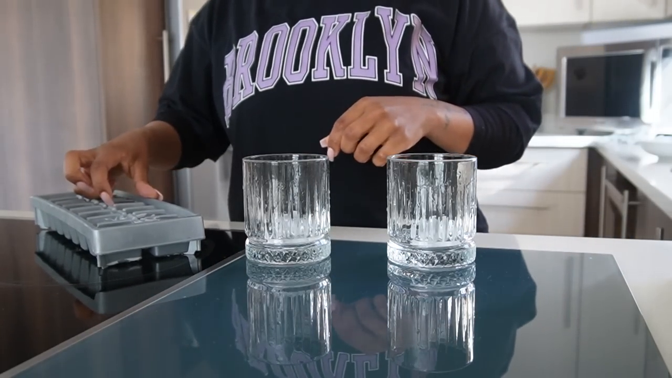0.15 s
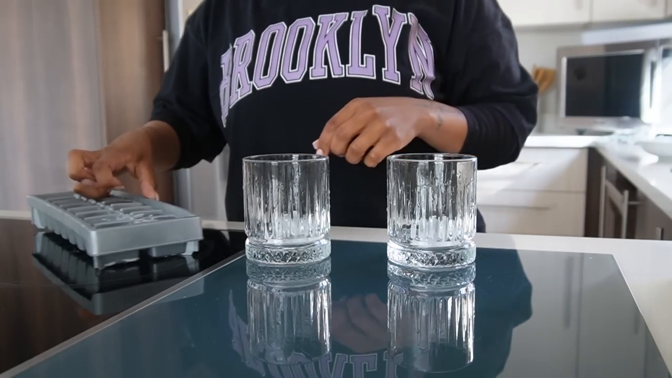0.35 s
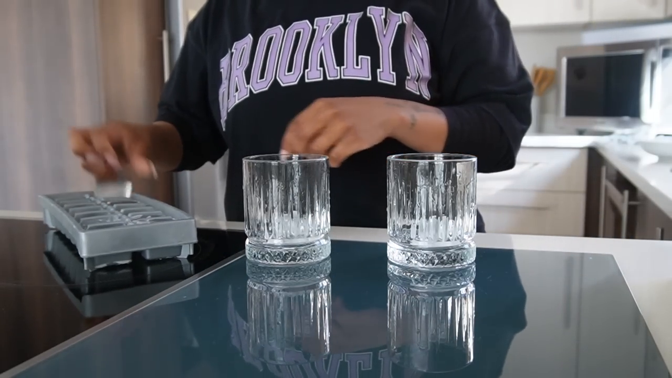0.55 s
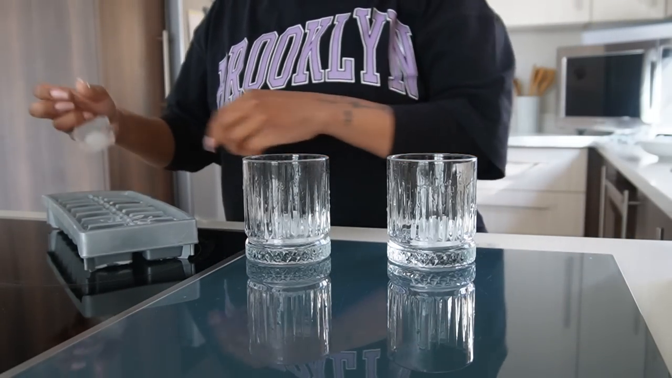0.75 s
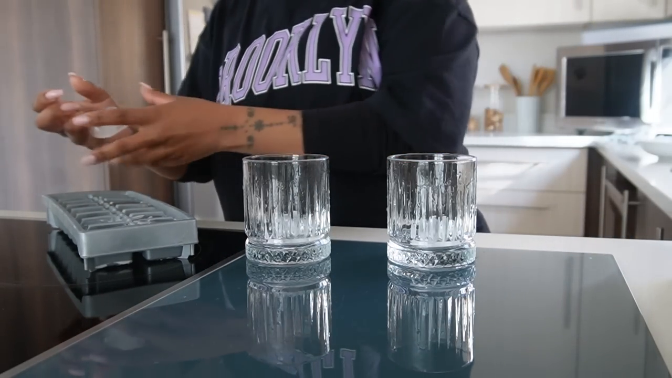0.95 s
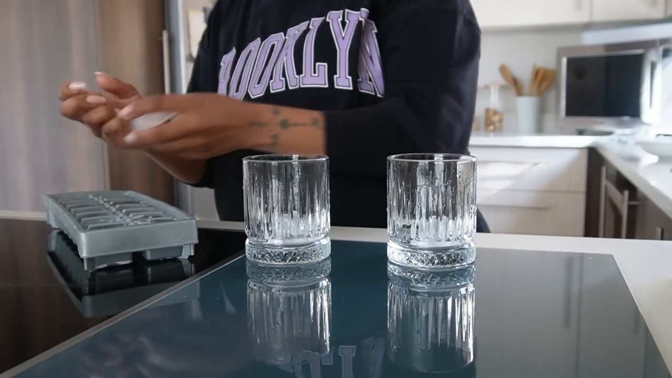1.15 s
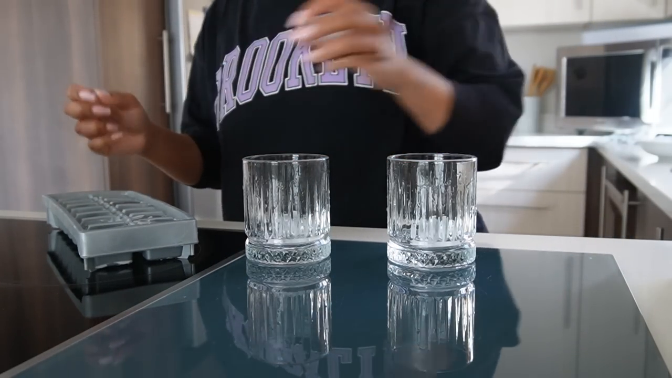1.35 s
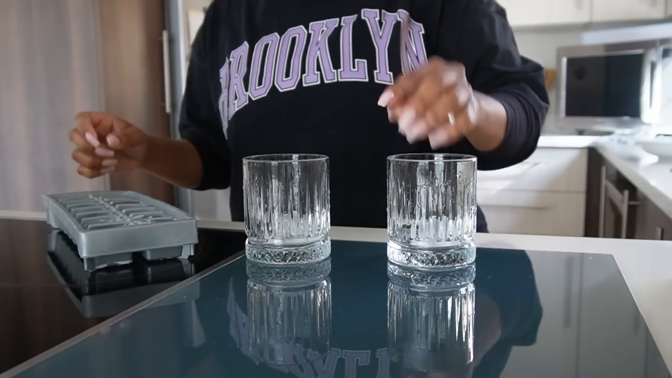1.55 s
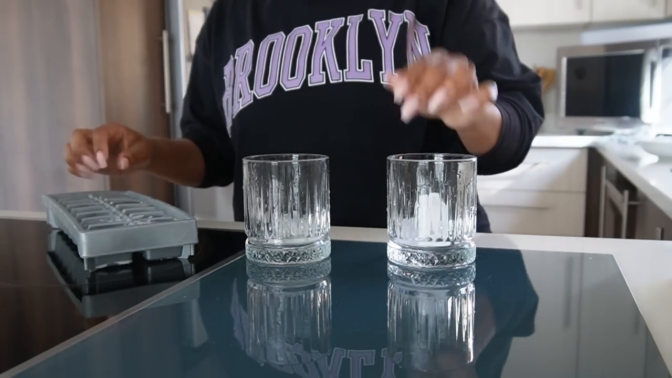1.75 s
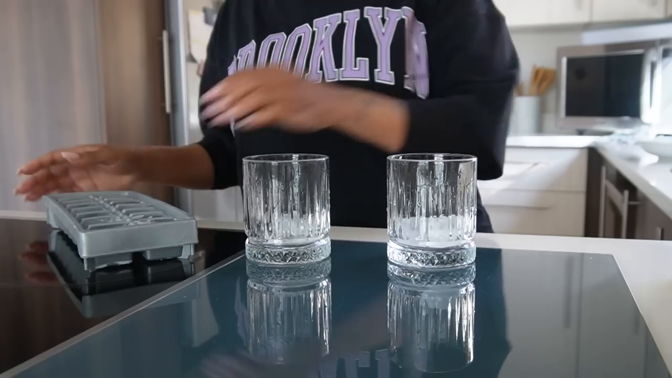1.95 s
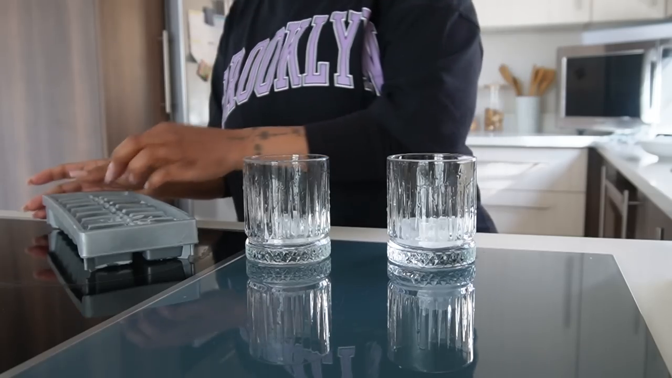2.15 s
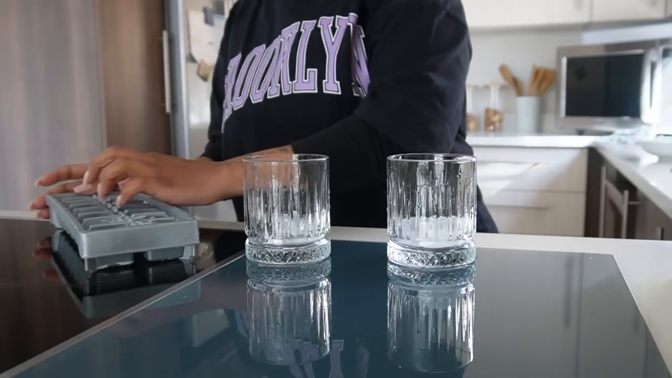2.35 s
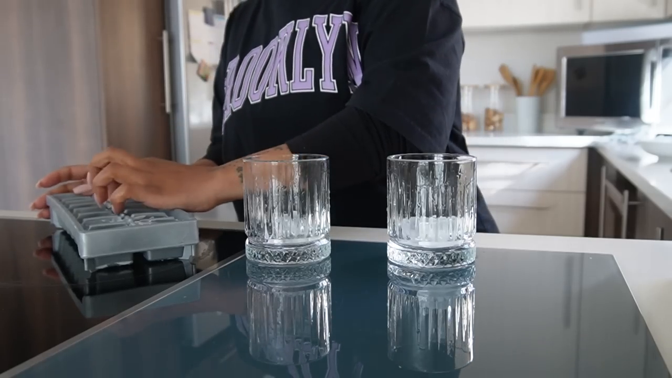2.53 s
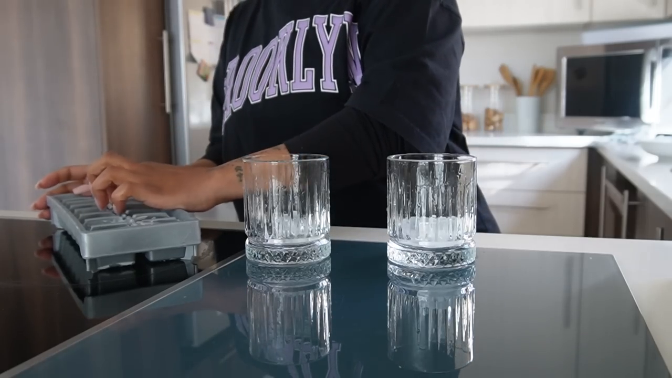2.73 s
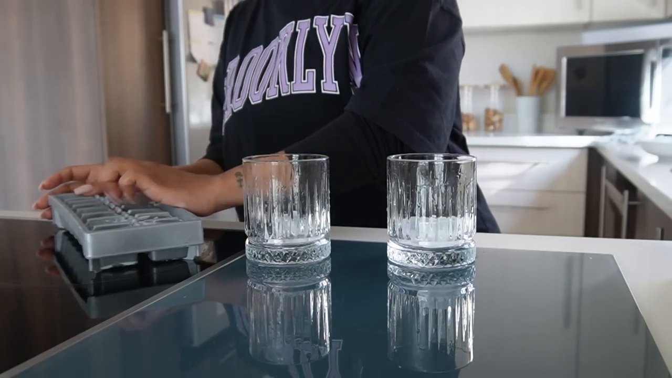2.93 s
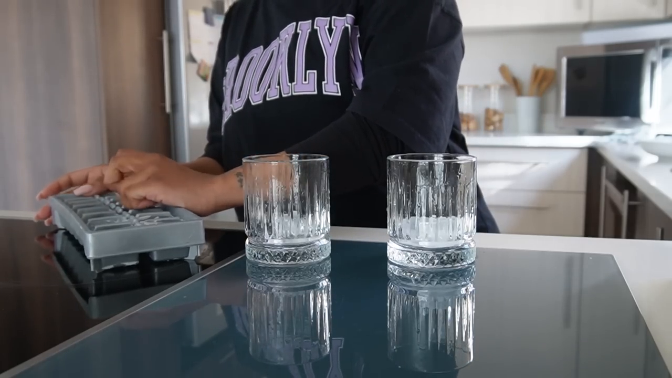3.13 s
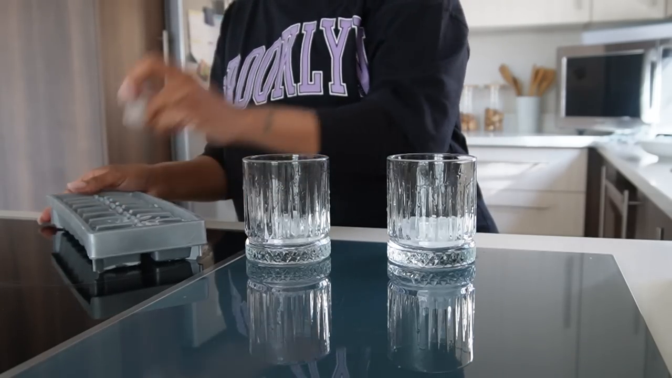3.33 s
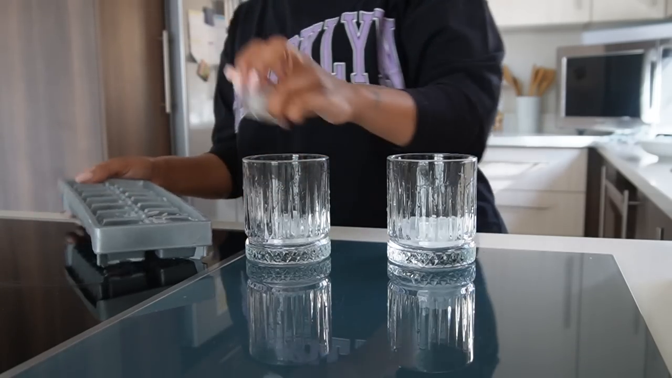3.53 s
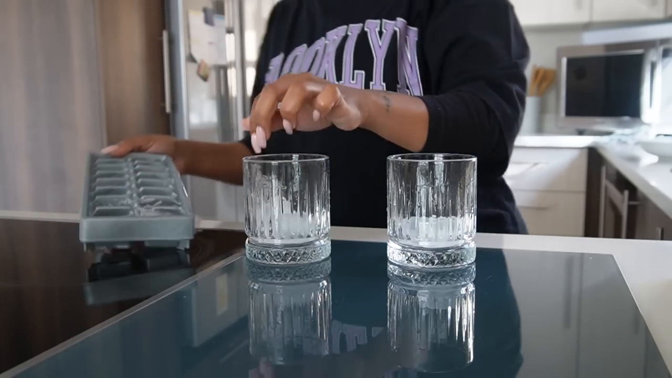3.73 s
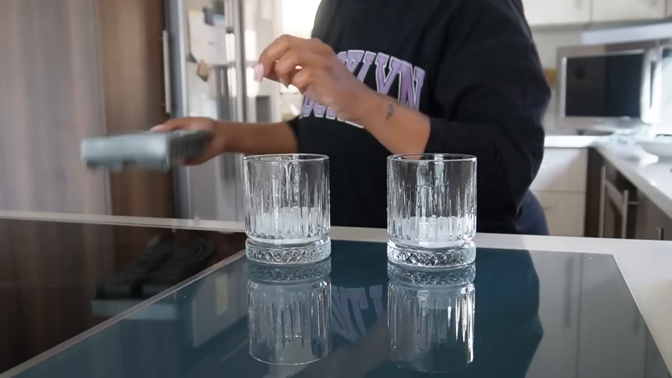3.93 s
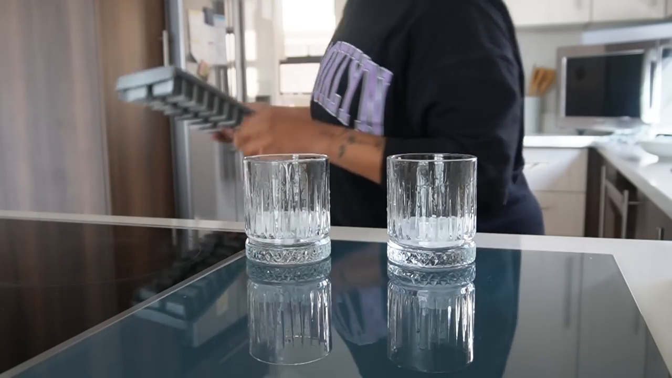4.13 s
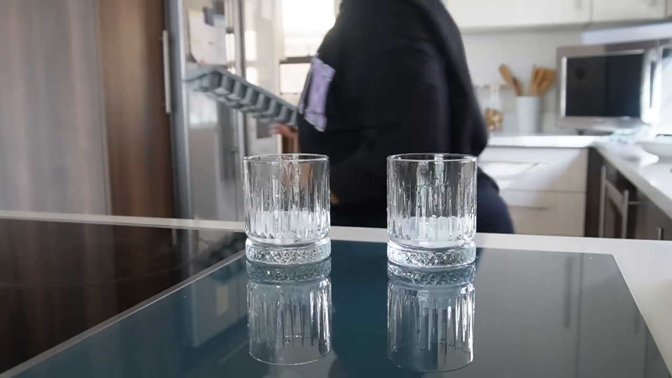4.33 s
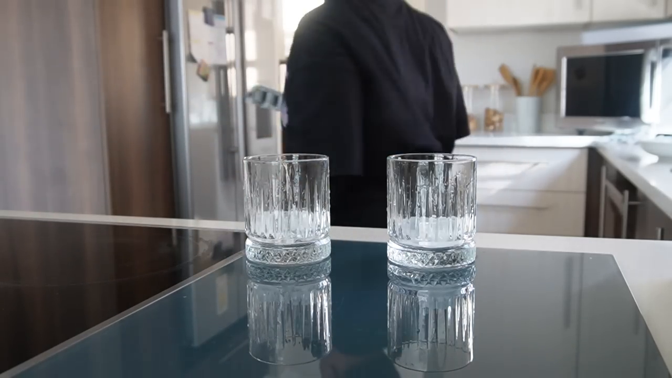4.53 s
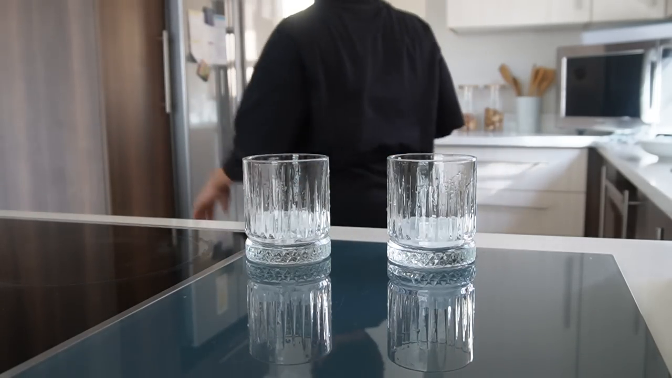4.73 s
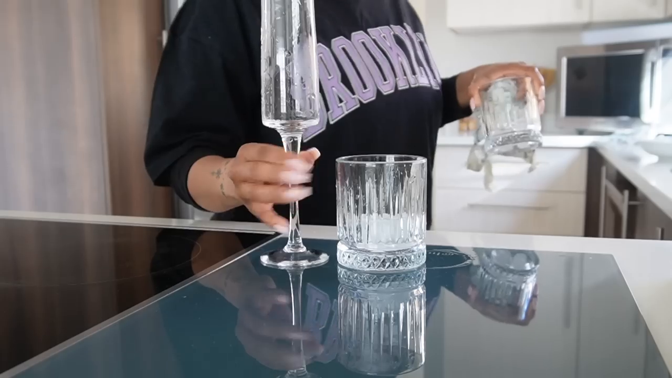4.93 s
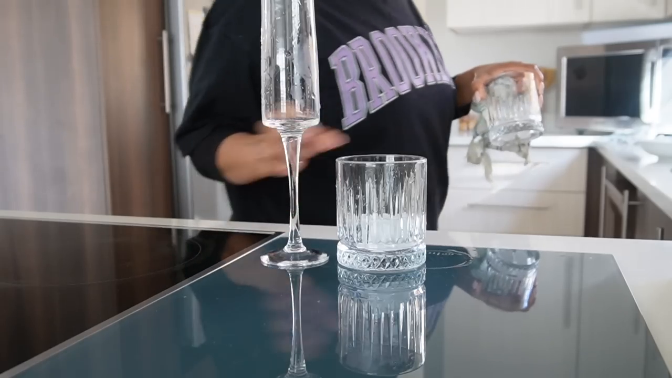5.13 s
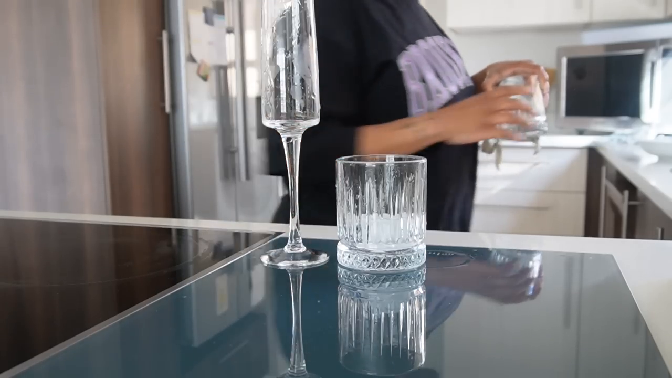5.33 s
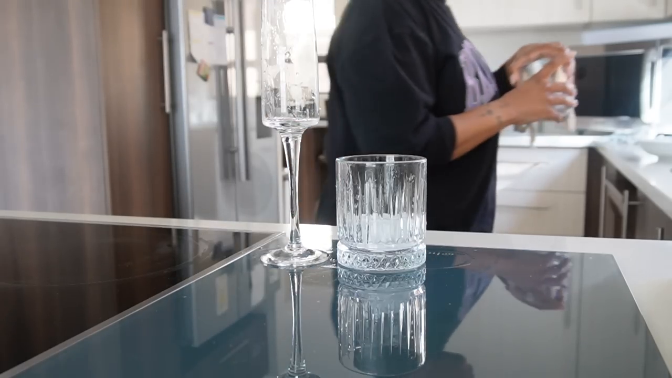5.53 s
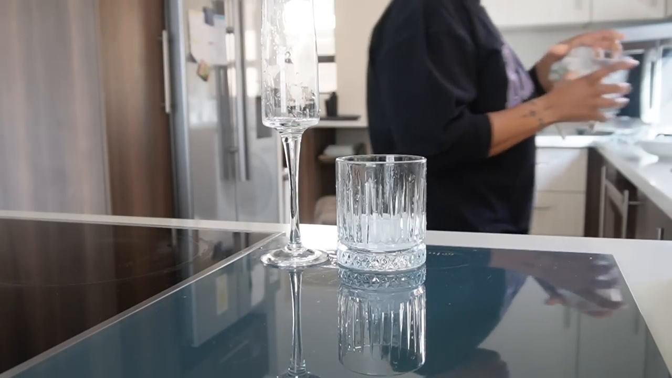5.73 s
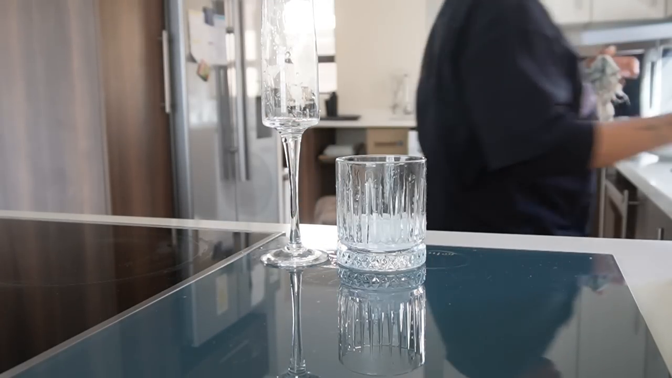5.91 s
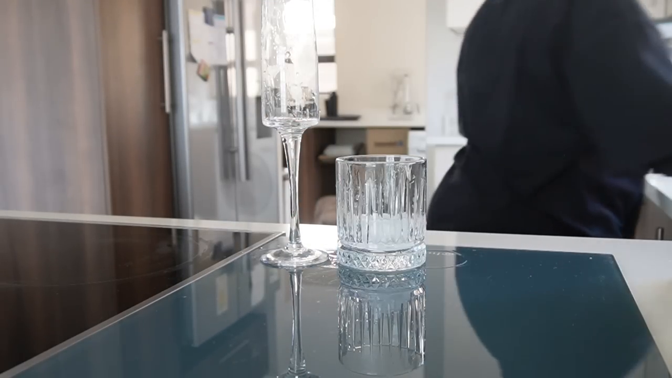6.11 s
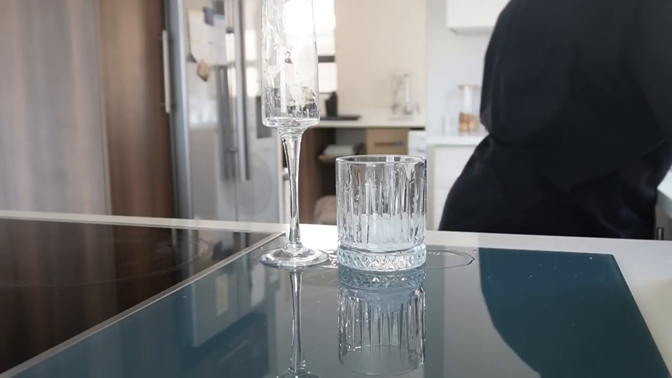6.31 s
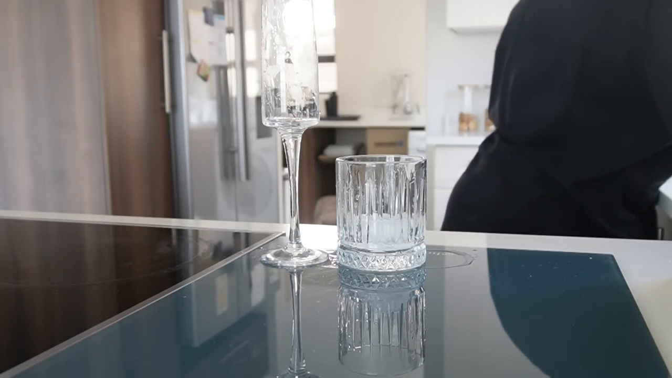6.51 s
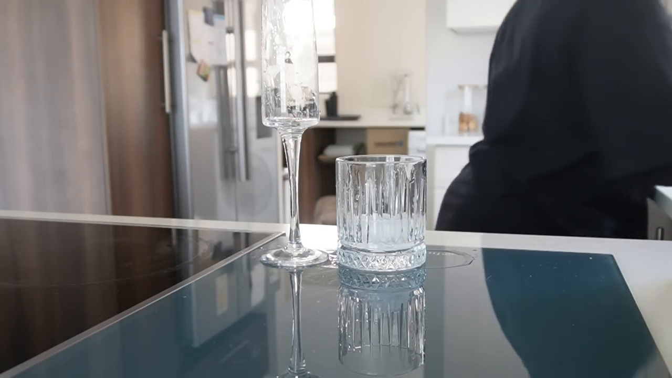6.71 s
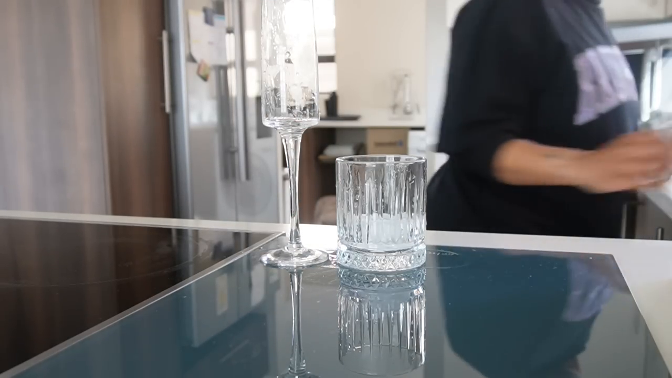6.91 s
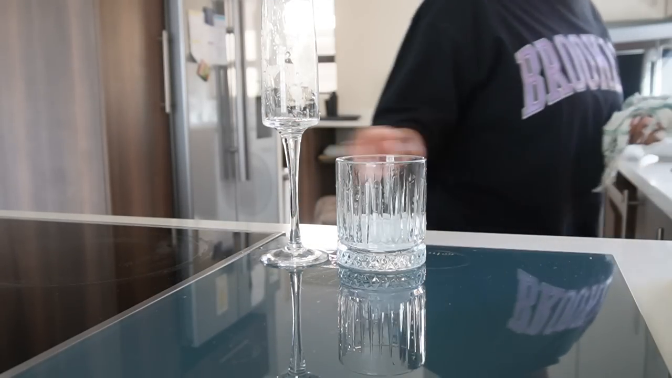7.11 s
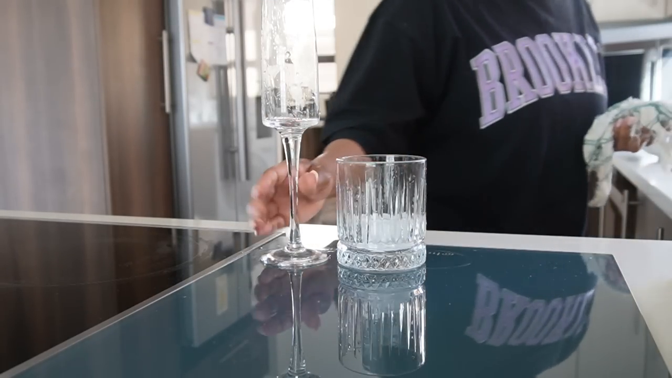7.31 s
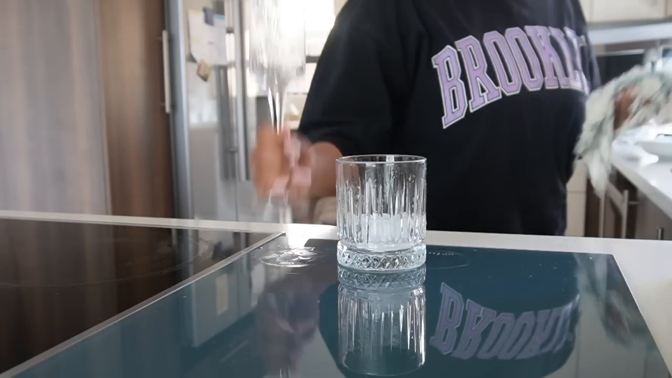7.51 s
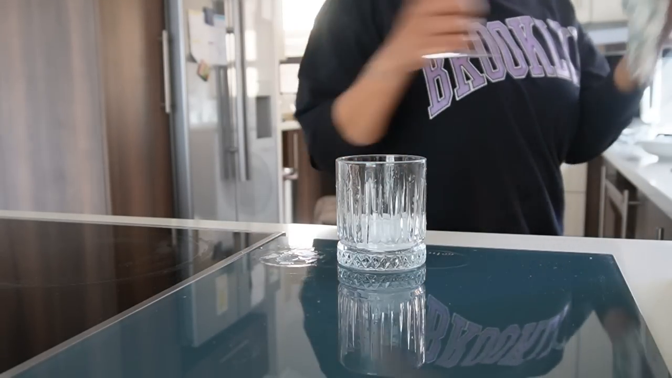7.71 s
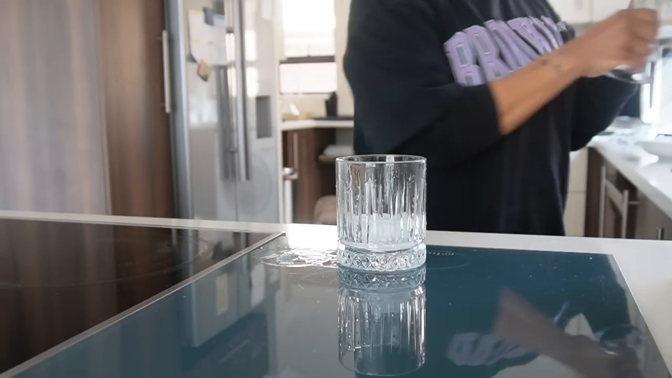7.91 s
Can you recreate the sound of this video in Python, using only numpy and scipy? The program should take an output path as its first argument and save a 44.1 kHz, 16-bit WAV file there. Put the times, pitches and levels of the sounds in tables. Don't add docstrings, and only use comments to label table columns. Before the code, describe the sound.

A lively, hard-walled kitchen, closely miked, with a faint steady fridge hum and thin tap hiss. From 0 to 0.8 s a stiff plastic ice tray snaps sharply, loudest near 0.35 s, with dry finger rubbing. At 1.7 s a cube knocks into a thick tumbler, bouncing and sliding until about 2.05 s with a hollow boom and short glassy ring. Tray cracks return from 2.3 to 3.5 s, strongest around 2.7. At 3.65 s a second cube clatters into another glass, ringing longer and clearer until about 3.95. At 4.9 s the water stops abruptly; ice jingles rapidly in a carried glass for a quarter second, over a low footstep thud. Soft distant glass taps follow at 5.6-6.15 s, then a loud echoing glass set-down with small rocks at 6.46-6.57. Faint taps at 7.2-7.5 and 7.9 end it over quiet hum.

```python
import sys
import numpy as np
from scipy import signal
from scipy.io import wavfile
from scipy.ndimage import uniform_filter1d

SR = 44100
rng = np.random.default_rng(int(sys.argv[2]) if len(sys.argv) > 2 else 0)


def waveform_to_disk(signal):
    frames = np.transpose(np.atleast_2d(signal))
    scaled = np.clip(frames, -1, 1) * 32767
    samples = np.round(scaled).astype(np.int16)
    wavfile.write(sys.argv[1], SR, samples)


def level_to_linear(level):
    exponent = np.asarray(level, float) / 20
    return 10 ** exponent


N = 355445
SCENE_CHANGE_S = 4.885

# f/Hz, level/dB rms, width/Hz
FRIDGE_LINES = [(400, -52.5, 4.2), (498.2, -45, 0.18), (2190, -58.5, 5.2), (2312, -52, 3.6),
                (2440, -84, 4.)]
# f/Hz, level/dB per Hz
AIR_SPECTRUM = [(47, -54), (80, -24), (170, -19), (259, -20.5), (395, -11), (441, -8), (493, -7),
                (550, -15), (734, -21), (1820, -12), (2220, -11), (3620, -10), (9190, -24.5), (14300, -38),
                (16000, -35)]
AIR_DB = -39.5
# f/Hz, level/dB per Hz
TAP_SPECTRUM = [(530, -54), (900, -12), (991, -51), (1490, -54), (1620, -14), (2540, -8), (4310, 0),
                (7310, -4), (13200, -19), (16000, -26)]
# t/s, level/dB
TAP_FLOW = [
    (0, -35),
    (3.5, -34.5),
    (4.88, -32.5),
]
# f/Hz, side level/dB under mid
APART = [(60, -11), (400, -14.5), (1000, -15.5), (4500, -22), (7000, -22), (11000, -14), (16000, -7)]

# t/s, peak level/dB, low f/Hz, high f/Hz, treble level/dB over peak
FIRST_SNAPS = [(0.0267, -7, 1900, 2460, -20), (0.0506, -8, 2100, 3650, -3), (0.2239, -9.5, 2080, 3250, 1.5),
               (0.3104, -9, 2110, 3640, -1), (0.34, -15, 2060, 2900, -2), (0.3437, -1, 1900, 2800, -4.5),
               (0.3476, -4, 1690, 2300, -7), (0.354, -16, 1970, 2900, -7), (0.359, -3.5, 1600, 3200, -24),
               (0.384, -6.5, 1880, 2680, -4), (0.4474, -13.5, 2200, 3600, -3), (0.513, -17, 2000, 3600, -1),
               (0.6053, -9.5, 1710, 3700, 1), (0.612, -17.5, 1110, 1750, -10),
               (0.631, -13.5, 1950, 2280, -4), (0.7262, -20, 2240, 3600, -10),
               (0.7501, -11, 2160, 3700, 1.5), (0.7556, -13.5, 2190, 3700, -8)]
# t/s, peak level/dB, low f/Hz, high f/Hz, treble level/dB over peak
SECOND_SNAPS = [(2.337, -26.5, 1250, 1510, -12), (2.43, -12, 2400, 3470, 1),
                (2.5652, -8.5, 2550, 3400, -18), (2.5883, -21, 1710, 3280, -11),
                (2.631, -14, 2060, 3400, -9), (2.6716, -13.5, 1950, 3220, -17),
                (2.6868, -5, 1480, 3300, -15), (2.7044, -2, 2040, 3230, -2.5),
                (2.793, -11.5, 2260, 3600, -1), (2.9409, -7, 2050, 3370, -14),
                (2.967, -21.5, 2100, 1690, -16), (3.0958, -17.5, 1880, 3300, -10),
                (3.147, -20, 2020, 3400, -6), (3.191, -10.5, 1410, 2500, -28), (3.283, -19, 2100, 3180, -3),
                (3.5009, -11, 1590, 2620, -27)]
SNAP_T60 = 0.04
# f/Hz, level/dB per Hz
CELL_BODY = [(100, -52), (343, -26), (415, -7.5), (836, -20.5), (1100, -11.5), (1870, -1), (3300, 0.5),
             (4600, -9), (9000, -31), (16000, -59)]
# start t/s, length/s, top level/dB, hollow pocket level/dB
TRAY_RUBS = [(.05, 0.046, -34, -4), (.355, 0.079, -27, 8.5), (.42, 0.063, -26, -5), (.53, 0.098, -21.5, -3),
             (.59, 0.072, -28, -8), (.755, 0.083, -39.5, 0), (2.68, 0.05, -25, 0.5), (2.72, 0.13, -28.5, 1),
             (2.95, 0.08, -36.5, 4.5), (3.0, 0.11, -32.5, -1), (3.085, 0.06, -35.5, 3.5),
             (3.14, 0.042, -36, 7), (3.195, 0.019, -42, 12), (3.26, 0.093, -30, -29)]
# f/Hz, level/dB per Hz
TRAY_BODY = [(59, -65), (100, -55), (343, -34), (415, -11.5), (836, -25.5), (970, -12), (1310, -15),
             (1870, -3), (2930, -2), (6290, -2.5), (16000, -40.5)]

# t/s, peak level/dB, low f/Hz, high f/Hz, treble level/dB over peak
RIGHT_KNOCKS = [(1.65, -26, 1500, 3100, -6), (1.688, -25, 760, 3000, 0), (1.719, -1, 1350, 2750, -21),
                (1.724, -10, 814, 3630, -25), (1.739, -12, 1350, 2700, -24), (1.7595, -7, 1750, 2430, -28),
                (1.766, -19, 1500, 4200, -23), (1.78, -11, 1420, 2500, -16), (1.807, -13, 1460, 3300, -18),
                (1.813, -16, 805, 1150, -12), (1.844, -13, 706, 2760, -16), (1.878, -6, 1920, 3330, -17),
                (1.8838, -4.5, 1540, 3000, -26), (1.896, -17, 1320, 4000, -28),
                (1.929, -5, 1290, 2580, -34), (1.961, -11.5, 1650, 2580, -25), (2.029, -20, 860, 1490, -18),
                (2.049, -24, 890, 1500, -20)]
# t/s, peak level/dB, low f/Hz, high f/Hz, treble level/dB over peak
LEFT_KNOCKS = [(3.644, -5.5, 1800, 2820, -9), (3.664, -4.5, 1040, 1520, -33), (3.709, 1.5, 2500, 3180, -27),
               (3.713, -18, 1150, 2860, -30), (3.728, -11, 1940, 2750, -31), (3.747, -5, 1190, 2600, -25),
               (3.752, -5, 1460, 2980, -28), (3.758, -5.5, 1420, 3200, -8), (3.766, -6, 1950, 3050, -31),
               (3.784, -19, 1950, 2650, -25), (3.797, -17, 2000, 2600, -28), (3.808, -15, 1140, 3250, -25),
               (3.849, -12.5, 1140, 3100, -27), (3.877, -15, 1450, 2400, -26),
               (3.897, -29, 1440, 2400, -26)]
KNOCK_T60 = 0.047
# f/Hz, level/dB per Hz
BOTTOM_BODY = [(60, -40), (270, -32), (750, -6.5), (1380, 2), (3200, 1), (4500, -4.5), (5500, -11),
               (9000, -28), (16000, -76)]
MOUTH_DB = (2.5, -6)
# t/s, peak level/dB
RIM_TICKS = [(1.6495, -24), (1.6872, -24), (1.7192, -19), (1.7398, -24), (1.8445, -30), (1.937, -30),
             (3.6368, -28), (3.7088, -11), (3.7255, -29), (3.7588, -17), (3.9012, -24)]
# start t/s, length/s, top level/dB, hollow pocket level/dB
CUBE_SLIDES = [
    (1.64, 0.43, -33, -7),
    (1.715, 0.16, -26.5, -1.5),
    (1.87, 0.17, -37.5, 7.5),
    (3.635, 0.1, -26, -11),
    (3.71, 0.33, -25.5, -11.5),
    (4.883, 0.16, -34.5, -3.5),
    (4.98, 0.32, -42.5, 3),
]
# t/s, level/dB of lowest mode, of second, of close pair, of the two around the pair
RIGHT_TOUCHES = [(1.6501, -42, -27, -35, -27), (1.6874, -24, -29, -27, -21), (1.719, -13, -29, -48, -43),
                 (1.7394, -15, -22, -18, -24), (1.7544, -7, -21, -23, -33), (1.7675, -17, -34, -38, -40),
                 (1.7804, -20, -26, -38, -50), (1.8064, -16, -36, -44, -45), (1.8448, -10, -39, -22.5, -47),
                 (1.861, -16, -30, -36, -50), (1.8784, -49, -36, -49, -48), (1.937, -9.5, -23, -31, -44),
                 (1.9809, -25, -41, -52, -52), (2.0, -24, -44, -54, -54), (2.025, -42, -47, -56, -56)]
# t/s, level/dB of lowest mode, of second, of close pair, of the two around the pair
LEFT_TOUCHES = [(3.6366, -23, -38, -32, -36), (3.6636, -33.5, -16, -32, -25),
                (3.7095, -8.5, -8.5, -48, -44), (3.7264, -10, -7, -38, -28), (3.7444, -5.5, -22, -32, -33),
                (3.76, -8, -13, -35, -38), (3.7975, -32, -17, -43, -50), (3.8087, -18, -19, -50, -50),
                (3.821, -30, -25, -52, -52), (3.829, -15, -27, -52, -52), (3.846, -22, -44, -52, -52),
                (3.8756, -17, -26, -52, -53), (3.886, -41, -28, -52, -53), (3.902, -28, -37, -52, -53),
                (3.912, -36, -44, -52, -51), (3.933, -25.5, -44, -58, -53)]
# f/Hz, level/dB, t60/s
RIGHT_WALL = [(2150, 0, 0.06), (4970, 4, 0.11), (8790, 1, 0.053), (10600, -0.5, 0.063), (11000, -3, 0.08),
              (13600, -6, .06)]
# f/Hz, level/dB, t60/s
LEFT_WALL = [(2160, 0, 0.21), (4917, -1.5, 0.44), (8650, -3, 0.15), (10630, -2, 0.19), (11080, 4.5, 0.085),
             (13700, -3, .08)]
MODE_COLUMN = [0, 1, 3, 2, 2, 3]

# t/s, peak level/dB, ring f/Hz, level/dB of the duller rings under it
CLINKS = [(4.8823, -18, 2920, -2), (4.8872, -17, 3170, -11), (4.891, -18, 2790, -1),
          (4.8975, -21, 2800, -11), (4.9015, -21, 2950, -7), (4.905, -18, 2880, -12),
          (4.911, -22, 2940, -14), (4.921, -18, 2800, -6), (4.93, -21, 2860, -3), (4.9444, -26, 2950, -14),
          (4.9584, -20, 3580, 1), (4.9656, -10.5, 2740, -5), (4.9835, -14, 2660, -7),
          (4.997, -25, 2600, -12), (5.0078, -14.5, 3670, 0.5), (5.023, -15, 3190, -10),
          (5.0335, -25, 3120, -14), (5.043, -23, 3160, -14), (5.062, -23, 2780, -10),
          (5.061, -28, 3750, -14), (5.0752, -18, 2670, -1), (5.0857, -21, 3700, -3), (5.096, -16, 3740, 2),
          (5.1, -21, 3700, -8), (5.107, -21, 3800, 1), (5.126, -30, 3750, -14), (5.146, -31, 3730, -10)]
HOLLOW_DB = -10
# f/Hz, level/dB per Hz
RUMBLE_SPECTRUM = [(15, -45), (25, -6), (49, 3), (108, -25), (156, 16.5), (206, -14.5), (260, -0.5),
                   (340, -28), (570, -120)]
# t/s, level/dB
RUMBLE_LEVEL = [
    (4.88, -46),
    (5.01, -57.5),
    (7.46, -56.5),
    (8.06, -63),
]
# t/s, peak level/dB, low f/Hz, high f/Hz, t60/s
FAR_TAPS = [(5.59, -38, 820, 2110, 0.099), (5.62, -35.5, 2144, 2150, 0.25), (5.68, -27, 3560, 3560, 0.024),
            (5.726, -25, 2420, 3700, 0.045), (5.78, -22.5, 3580, 3720, 0.044),
            (5.782, -29, 2370, 2970, 0.11), (6.108, -27, 900, 2910, 0.14), (6.11, -32, 2350, 3330, .12),
            (6.152, -31, 2200, 3300, 0.12), (6.13, -31, 950, 2150, 0.15), (7.221, -25, 1410, 202, 0.14),
            (7.23, -33.5, 2280, 3260, 0.23), (7.25, -38, 1400, 2300, .3), (7.3, -37, 1460, 1705, 0.25),
            (7.464, -33, 870, 2160, 0.092), (7.878, -29, 6970, 4730, 0.071), (7.883, -29, 8100, 3800, .06)]
FAR_TREBLE_DB = -24
# t/s, peak level/dB, ring level/dB over the knock
SET_DOWN = [
    (6.4638, -1, -23),
    (6.472, -1.5, -10),
    (6.504, -9, -11.5),
    (6.531, -8.5, -12),
    (6.572, -19.5, -15),
]
# f/Hz, level/dB per Hz
SHELF_BODY = [(35, -71), (95, -52), (146, -11.5), (290, -14), (395, -12), (719, -17.5), (897, -6),
              (2080, -3.5), (3000, -9), (4630, -17), (12000, -69), (15600, -89), (22000, -120)]
# f/Hz, level/dB, t60/s
SHELF_MODES = [(401, -5, 0.23), (577, -6, .11), (917, -4, 0.17), (1085, -2, .15), (1134, -1, 0.24),
               (1290, -1, 0.18), (1760, -4, 0.15), (2020, 0, 0.14), (2105, 4, 0.19), (2740, -6, .15),
               (3180, -1.5, 0.16), (4477, -1, 0.29), (4920, 5, 0.044), (6980, -27, 0.092)]
# f/Hz, t60/s
KITCHEN = [(200, 0.92), (530, 0.84), (1390, 0.58), (3680, 0.54), (7000, 0.62), (12000, 0.32)]


def evened(x):
    return x / np.sqrt(np.mean(x ** 2) + 1e-20)


def read(points, hz):
    f, value = np.transpose(points)
    return np.interp(np.log(hz + 1), np.log(f + 1), value)


def add(mix, s, sound):
    part = mix[round(s * SR):][:len(sound)]
    part += sound[:len(part)]


def smoothed(x, first, second):
    return evened(uniform_filter1d(uniform_filter1d(x, size=first), size=second))


def filtered(x, order, hz, kind):
    return signal.sosfilt(signal.butter(order, hz, kind, fs=SR, output="sos"), x)


def colour(x, spectrum):
    hz = abs(np.fft.fftfreq(4096, 1 / SR))
    log_gain = np.log(level_to_linear(np.maximum(read(spectrum, hz), -100)))
    taps = np.fft.ifft(np.exp(np.conj(signal.hilbert(log_gain)))).real[:2048]
    return signal.oaconvolve(x, taps / np.linalg.norm(taps))[:len(x)]


def ring(hz, t60, t, phase=0):
    return level_to_linear(-60 * t / t60) * np.sin(2 * np.pi * hz * t + phase)


def resonate(x, hz, width_hz):
    turn = np.exp(2j * np.pi * np.cumsum(hz) / SR)
    r = np.exp(-np.pi * width_hz / SR)
    smooth = signal.lfilter([(1 - r) ** 2], [1, -2 * r, r * r], x / turn)
    return 2 * (turn * smooth).real


def steady(spectrum, patchy_db):
    frames, hz = N // 256 + 5, np.fft.rfftfreq(1024, 1 / SR)
    a, b, c, d, patches = rng.standard_normal((frames, 513, 5)).T
    patches = uniform_filter1d(patches, size=12, axis=0)
    patches = evened(uniform_filter1d(patches, size=12, axis=1))
    middle = a + 1j * b
    apart = level_to_linear(read(APART, hz))[:, None] * (c + 1j * d)
    gain = level_to_linear(read(spectrum, hz)[:, None] + patchy_db * patches)
    z = np.array([middle + apart, middle - apart]) * gain
    return evened(signal.istft(z, nperseg=1024, noverlap=768)[1][:, :N])


def blows(rows, body, ring_share, high_db, own_db, burst_db, tick_db, treble_db, rise_s, crack_s, top_hz):
    t = np.arange(8000) / SR
    rise = np.minimum(t / rise_s, 1)
    tone, burst, crack = np.zeros((3, N))
    for s, db, low_hz, high_hz, crack_db, t60 in rows:
        ring_s = ring_share * t60
        noise = rng.standard_normal((3, len(t))) * rise
        cycles = (ring(low_hz, ring_s, t) + level_to_linear(high_db) * ring(high_hz, ring_s, t)) * rise
        near = sum(evened(resonate(noise[2], np.full(len(t), hz), 4.2 / ring_s)) for hz in (low_hz, high_hz))
        add(tone, s, level_to_linear(db) * (cycles + level_to_linear(own_db - 60 * t / t60) * near))
        add(burst, s, level_to_linear(db + burst_db - 60 * t / t60) * noise[0])
        add(burst, s, level_to_linear(db + tick_db) * np.ones(1))
        add(crack, s, level_to_linear(db + crack_db + treble_db - 60 * t / crack_s) * noise[1])
    return filtered(tone, 4, 170, "high") + colour(burst, body) + filtered(crack, 2, [3800, top_hz], "band")


def rubbing(strokes, body, per_s, spread_db, pocket_hz, width_hz, skew):
    slip_size = level_to_linear(spread_db * np.minimum(rng.exponential(1, N), 3))
    slips = rng.standard_normal(N) * slip_size * (rng.random(N) < per_s / SR)
    wander = smoothed(rng.standard_normal(N), 1500, 1500)
    stroke, pocket = np.zeros((2, N))
    for s, length, db, pocket_db in strokes:
        swell = np.sin(np.pi * np.linspace(0, 1, round(length * SR)) ** skew) ** 2
        add(stroke, s, level_to_linear(db) * swell)
        add(pocket, s, level_to_linear(db + pocket_db) * swell)
    hollow = resonate(slips, pocket_hz * (1 + 0.1 * wander), width_hz)
    return stroke * evened(colour(slips, body)) + pocket * evened(hollow)


def fridge():
    t, out = np.arange(N) / SR, np.zeros(N)
    for hz, db, width_hz in FRIDGE_LINES:
        r = np.exp(-np.pi * width_hz / SR)
        once = signal.lfilter([1], [1, -r], rng.standard_normal((2, N)))
        waver = evened(signal.lfilter([1], [1, -r], once))
        angle = 2 * np.pi * hz * t
        out += level_to_linear(db) * evened((68 + waver[0]) * np.cos(angle) + waver[1] * np.sin(angle))
    return out


def room_air():
    return level_to_linear(AIR_DB) * steady(AIR_SPECTRUM, patchy_db=0.45)


def tap():
    t = np.arange(N) / SR
    flow = level_to_linear(np.interp(t, *np.transpose(TAP_FLOW)) + 1.5)
    return steady(TAP_SPECTRUM, patchy_db=1.2) * flow * np.clip((SCENE_CHANGE_S - t) / 0.00072, 0, 1)


def ice_tray():
    rows = [(*row, SNAP_T60) for row in FIRST_SNAPS + SECOND_SNAPS]
    snaps = blows(rows, CELL_BODY, ring_share=0.19, high_db=-5, own_db=-9, burst_db=-9, tick_db=-4,
                  treble_db=-0.5, rise_s=0.00062, crack_s=0.029, top_hz=8800)
    return snaps + rubbing(TRAY_RUBS, TRAY_BODY, 6000, 1.6, pocket_hz=1950, width_hz=710, skew=0.57)


def cube_slides():
    return rubbing(CUBE_SLIDES, BOTTOM_BODY, 2500, 0.52, pocket_hz=793, width_hz=510, skew=0.36)


def rim_ticks():
    t, out = np.arange(400) / SR, np.zeros(N)
    for s, db in RIM_TICKS:
        add(out, s, level_to_linear(db - 60 * t / 0.0062) * rng.standard_normal(len(t)))
    return filtered(out, 2, [7000, 14000], "band")


def cube(knocks, mouth_db):
    rows = [(*row, KNOCK_T60) for row in knocks]
    out = blows(rows, BOTTOM_BODY, ring_share=0.2, high_db=-1, own_db=-13, burst_db=-8.5, tick_db=9.5,
                treble_db=15, rise_s=0.00058, crack_s=0.012, top_hz=7040)
    return out + level_to_linear(mouth_db) * resonate(out, np.full(N, 760.0), width_hz=100)


def tumbler_wall(touches, modes):
    s, *level_db = np.transpose(touches)
    t = np.arange(s[0], s[-1] + 0.5, 1 / SR)
    last = np.searchsorted(s, t, "right") - 1
    since = t - s[last]
    phase, out = 2 * np.pi * rng.random((len(s), len(modes))), np.zeros(N)
    for k, (hz, db, t60) in enumerate(modes):
        flutter = smoothed(rng.standard_normal(N), 300, 200)[:len(t)]
        mode_db = level_db[MODE_COLUMN[k]][last] + db + 2.2 * np.minimum(flutter, 0.5)
        size = level_to_linear(mode_db) * np.minimum(since / 0.001, 1)
        add(out, s[0], size * ring(hz, t60, since, phase[last, k] + 0.3 * flutter))
    return out


def clinks():
    t, out = np.arange(2000) / SR, np.zeros(N)
    for s, db, hz, dull_db in CLINKS:
        dull = ring(hz * 0.65, 0.009, t) + level_to_linear(HOLLOW_DB) * ring(rng.uniform(950, 1270), 0.036, t)
        ping = ring(hz, 0.014, t) + level_to_linear(dull_db) * dull
        add(out, s, level_to_linear(db) * ping * np.minimum(t / 0.0011, 1))
    return out


def rumble():
    t = np.arange(N) / SR
    level = level_to_linear(np.interp(t, *np.transpose(RUMBLE_LEVEL)) + 0.5)
    return steady(RUMBLE_SPECTRUM, patchy_db=1.5) * level * np.clip((t - SCENE_CHANGE_S) / 0.011, 0, 1)


def far_taps():
    rows = [(*row[:4], FAR_TREBLE_DB, row[4]) for row in FAR_TAPS]
    return blows(rows, SHELF_BODY, ring_share=0.22, high_db=2, own_db=-8.5, burst_db=-11, tick_db=-4,
                 treble_db=-1, rise_s=0.0018, crack_s=0.03, top_hz=6500)


def set_down():
    t, out = np.arange(SR // 3) / SR, np.zeros(N)
    for s, db, ring_db in SET_DOWN:
        knock = colour(level_to_linear(-60 * t / 0.15) * rng.standard_normal(len(t)), SHELF_BODY)
        modes = sum(level_to_linear(mode_db) * ring(hz, t60, t, 2 * np.pi * rng.random())
                    for hz, mode_db, t60 in SHELF_MODES)
        add(out, s, level_to_linear(db - 9) * (knock + level_to_linear(ring_db) * modes) * np.minimum(t / 0.002, 1))
    return out


def kitchen(x):
    taps = np.zeros((2, SR))
    at = np.arange(200, SR - 20, 20) + rng.integers(0, 20, (2, (SR - 201) // 20))
    np.put_along_axis(taps, at, rng.choice([-1.0, 1.0], at.shape), 1)
    taps = taps[0] + 0.13 * taps[1] * np.array([[1], [-1]])
    hz, t, z = signal.stft(taps, SR, nperseg=256)
    fade = level_to_linear(-60 * t / read(KITCHEN, hz)[:, None])
    tail = signal.istft(z * fade, SR, nperseg=256)[1]
    return signal.fftconvolve(x[None], tail / np.linalg.norm(tail[0]), axes=1)[:, :N]


def scene():
    tray = ice_tray()
    cubes = cube(RIGHT_KNOCKS, MOUTH_DB[0]) + cube(LEFT_KNOCKS, MOUTH_DB[1]) + rim_ticks() + cube_slides()
    walls = tumbler_wall(RIGHT_TOUCHES, RIGHT_WALL) + tumbler_wall(LEFT_TOUCHES, LEFT_WALL)
    small = clinks() + far_taps()
    far = set_down()
    echoes = kitchen(level_to_linear(-8.5) * (tray + cubes) + level_to_linear(-6) * walls + level_to_linear(-9.5) * small + level_to_linear(-5) * far)
    near = tray + cubes + walls + small
    direct = near * level_to_linear(np.array([[-0.3], [0.3]])) + far * level_to_linear(np.array([[-1.2], [1.2]]))
    direct = direct + 0.061 * np.roll(direct[1], 130) * np.array([[1], [-1]])
    knocks = filtered(direct + echoes, 4, 105, "high")
    return knocks + fridge() + room_air() + tap() + rumble()


def low_pass(x):
    return signal.sosfilt(signal.butter(12, 16460, fs=SR, output="sos"), x)


def record(dry):
    treble = filtered(np.roll(dry[0], 40), 3, 8000, "high")
    wide = dry + 0.5 * treble * np.array([[1], [-1]])
    wide -= 0.46 * filtered(dry - dry.mean(0), 2, 400, "low")
    power = abs(uniform_filter1d((wide ** 2).mean(0), size=400))
    power_db = 10 * np.log10(power + 1e-12)
    fall = np.arange(N) * 60 / SR
    held_db = np.maximum.accumulate(power_db + fall) - fall
    over_db = np.maximum(held_db + 10.5, 0)
    duck = level_to_linear(0.6 * uniform_filter1d(over_db, size=200))
    ducked = np.tanh(0.77 * wide / duck) / 0.82
    ducked = filtered(ducked, 2, 45, "high")
    lowpass = signal.firwin(511, 15900, window=("kaiser", 9), fs=SR)
    mix = signal.oaconvolve(ducked, lowpass[None], "same")
    return low_pass(mix)


dry = scene()
out = record(dry)
waveform_to_disk(out)
```